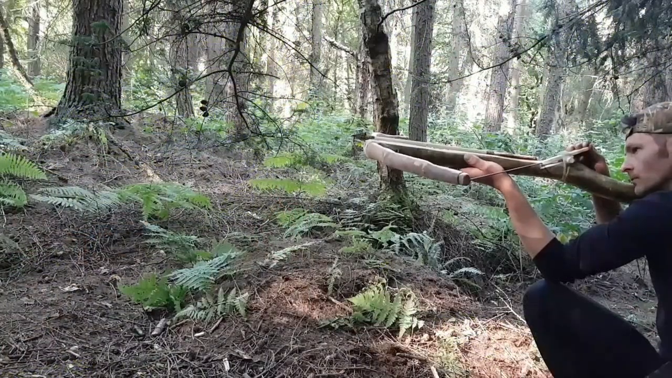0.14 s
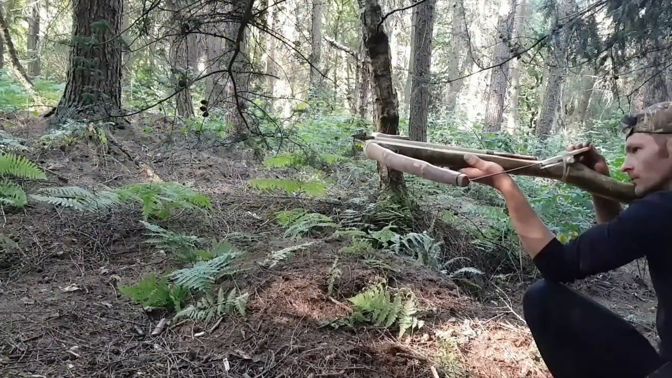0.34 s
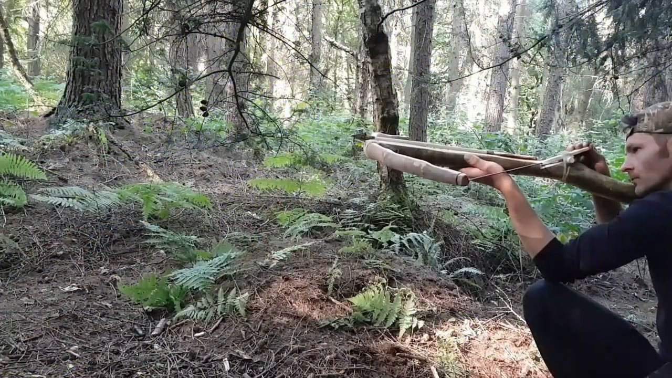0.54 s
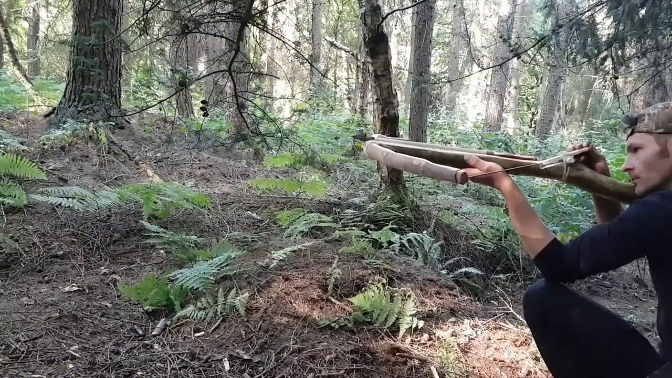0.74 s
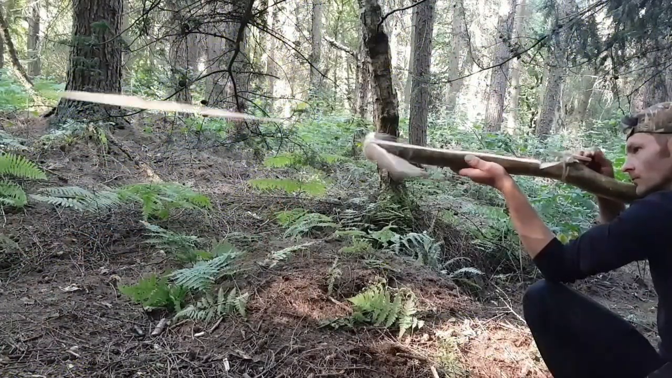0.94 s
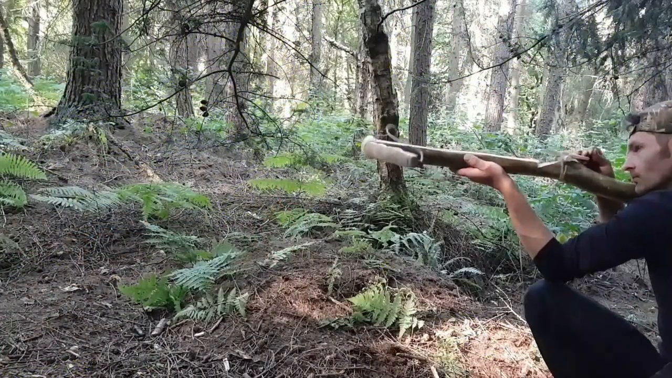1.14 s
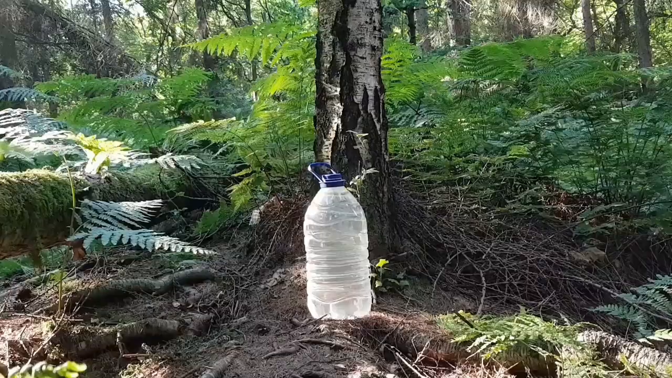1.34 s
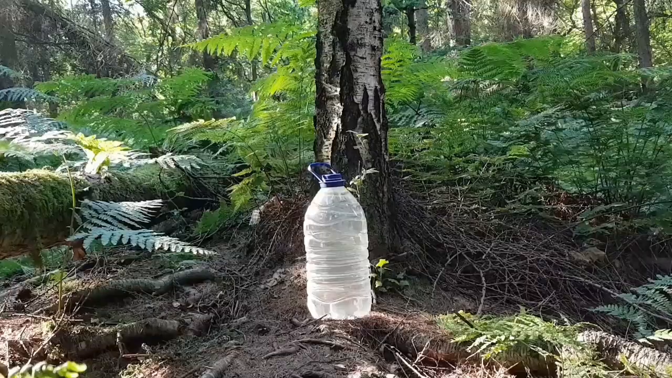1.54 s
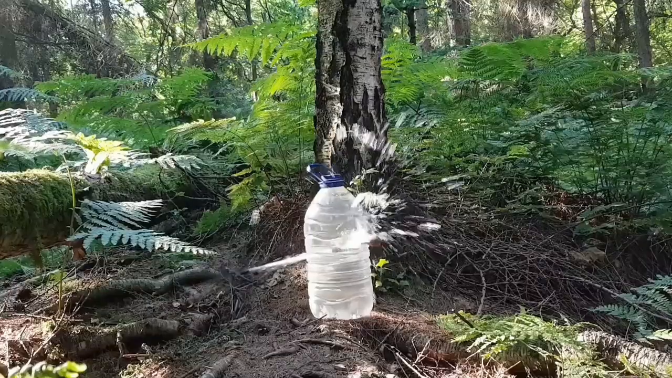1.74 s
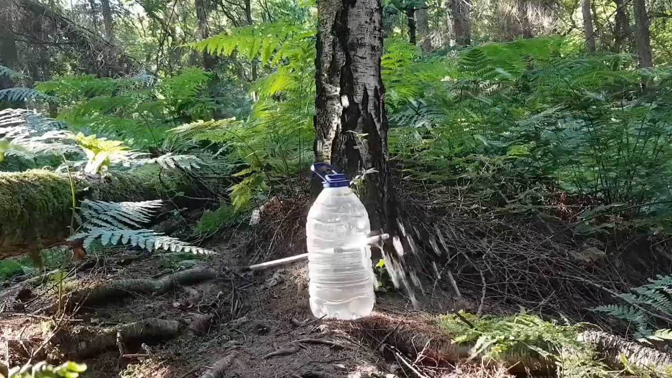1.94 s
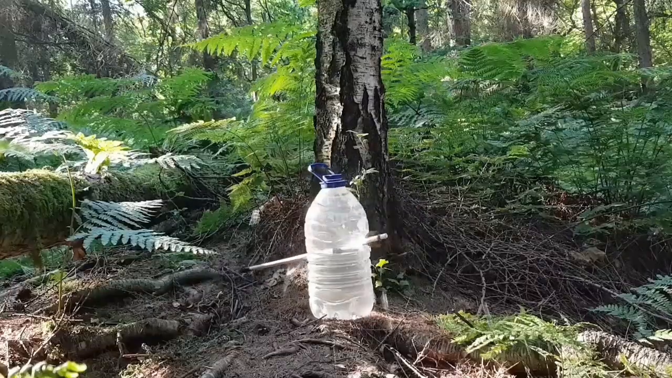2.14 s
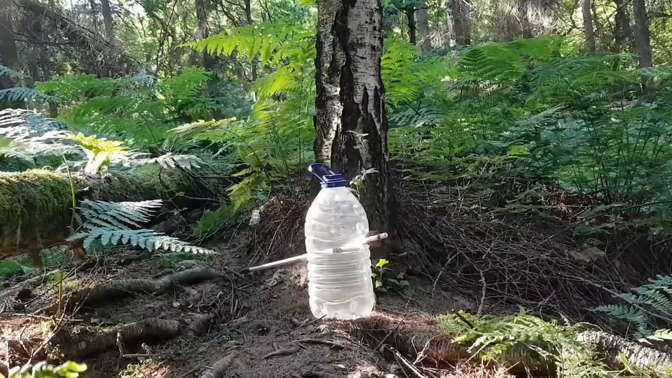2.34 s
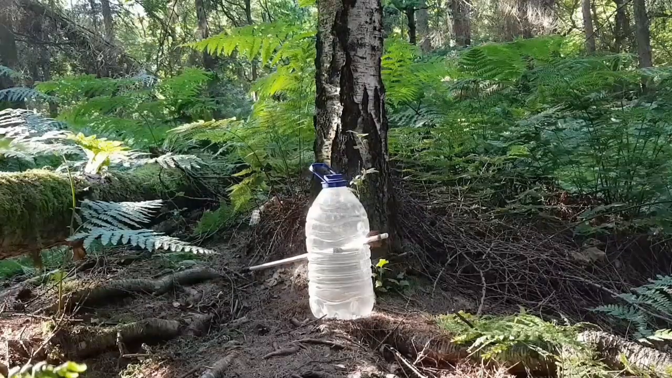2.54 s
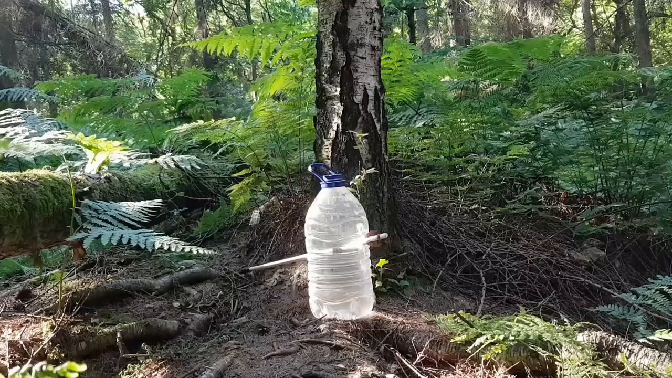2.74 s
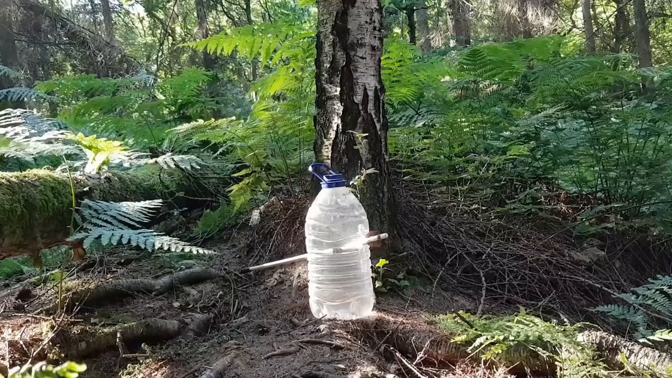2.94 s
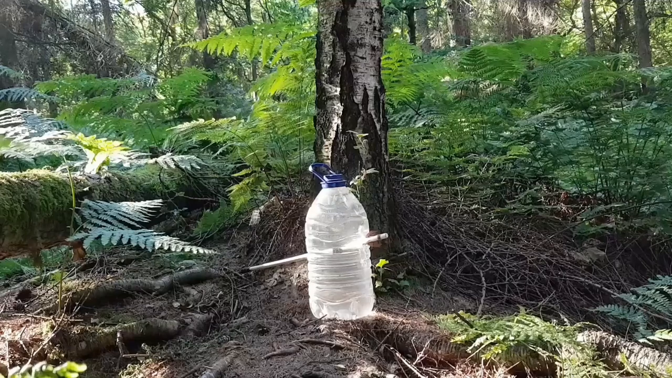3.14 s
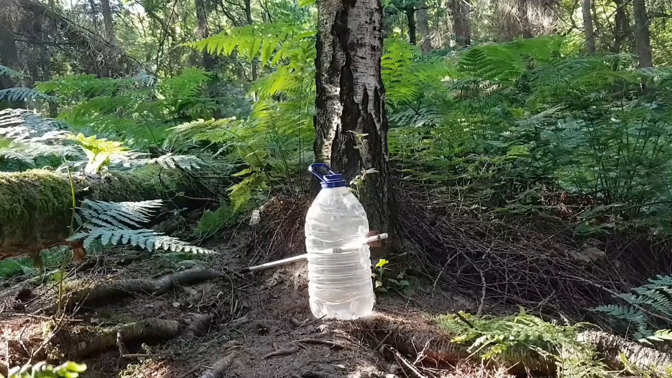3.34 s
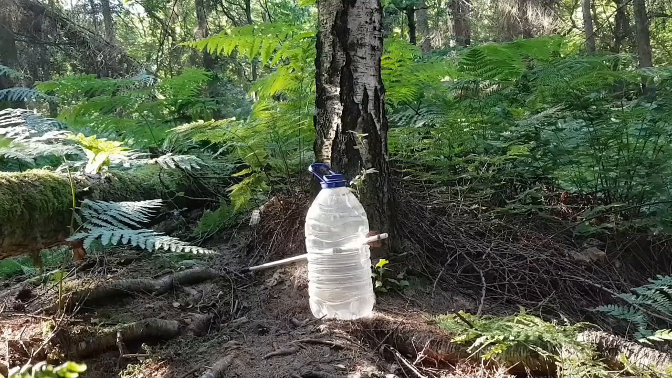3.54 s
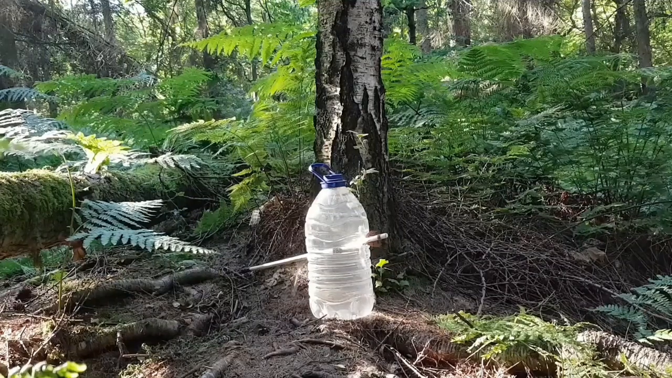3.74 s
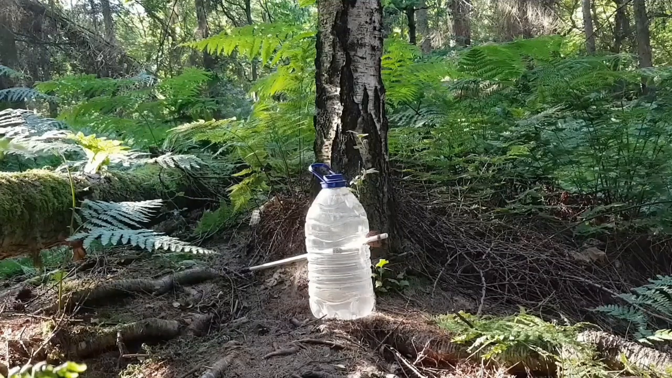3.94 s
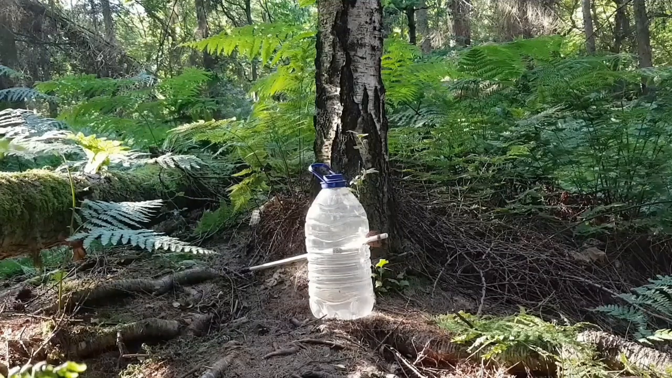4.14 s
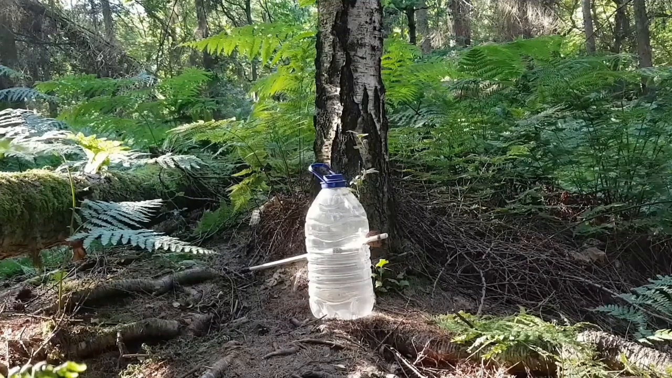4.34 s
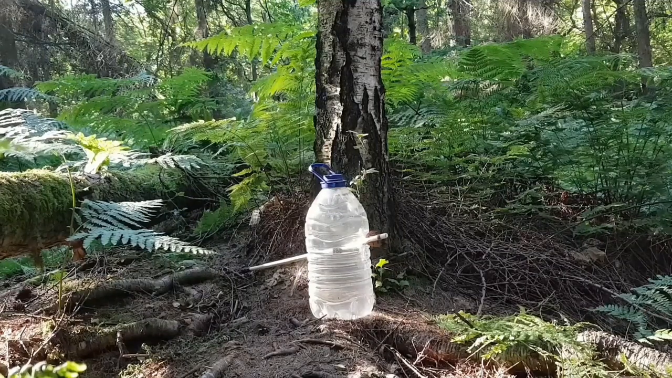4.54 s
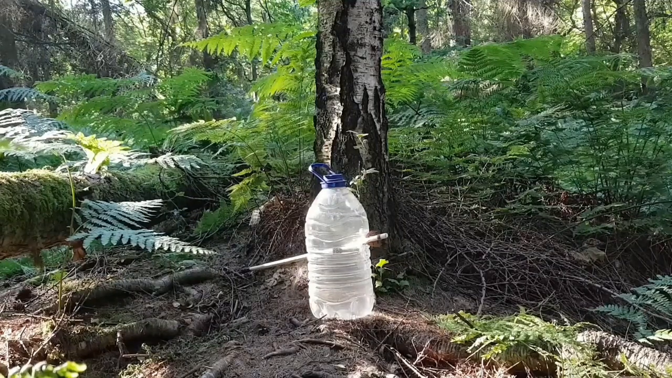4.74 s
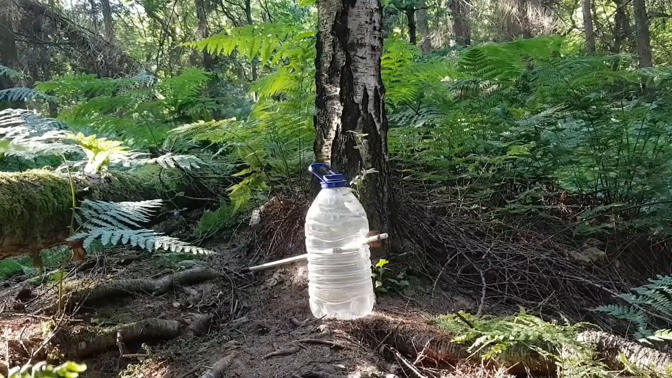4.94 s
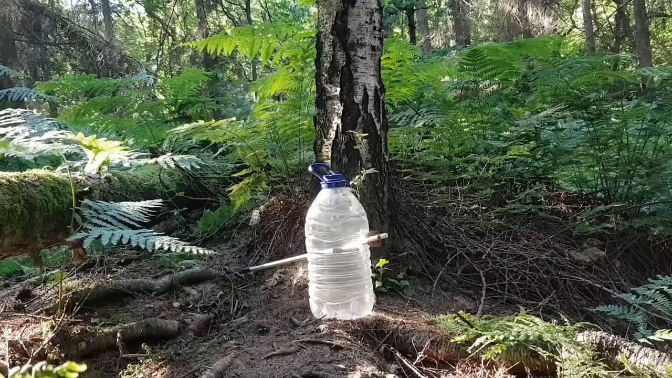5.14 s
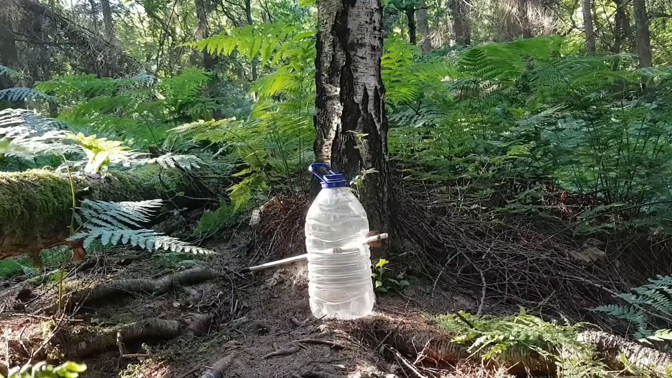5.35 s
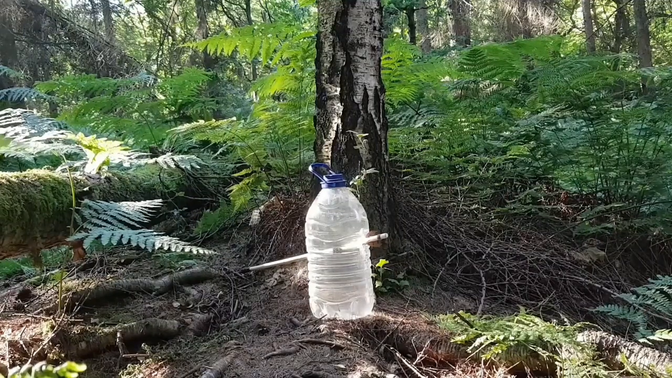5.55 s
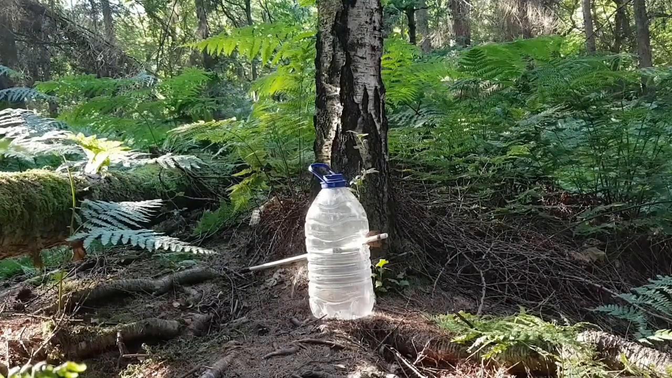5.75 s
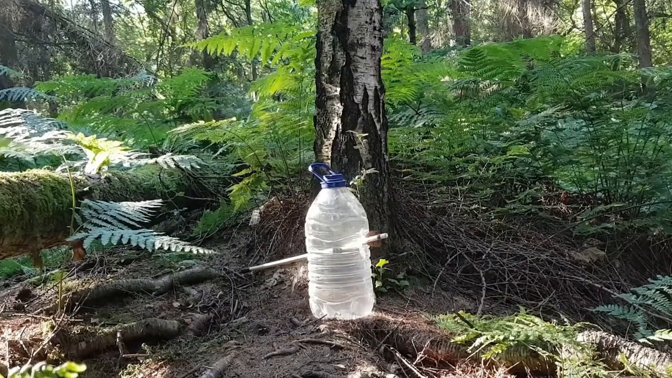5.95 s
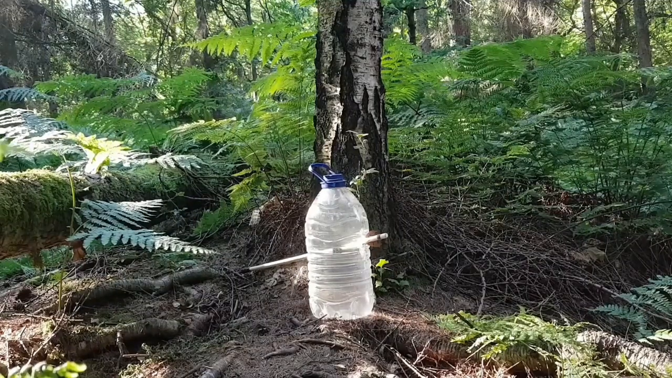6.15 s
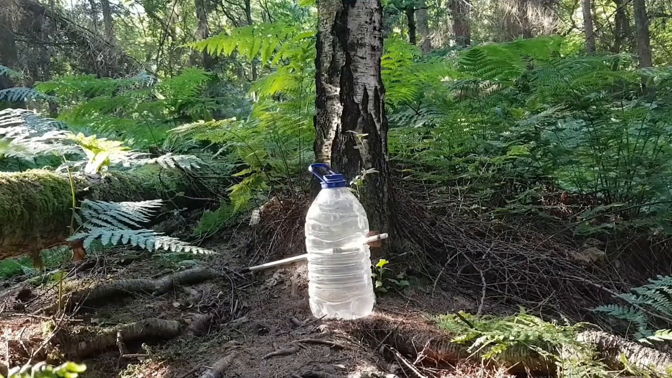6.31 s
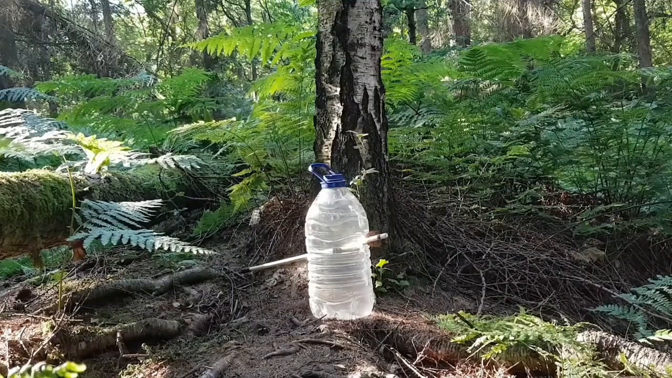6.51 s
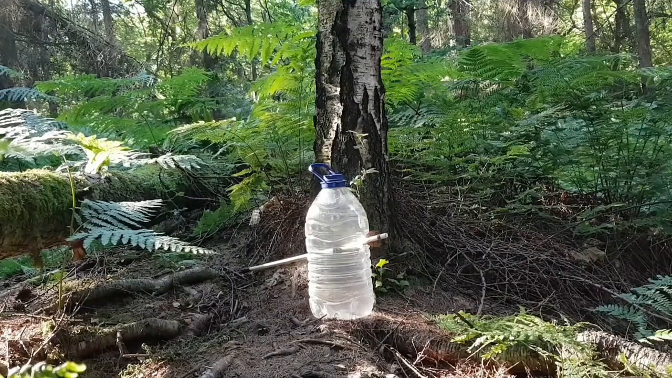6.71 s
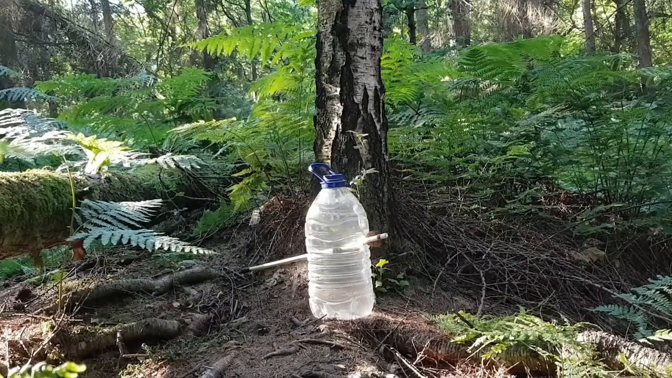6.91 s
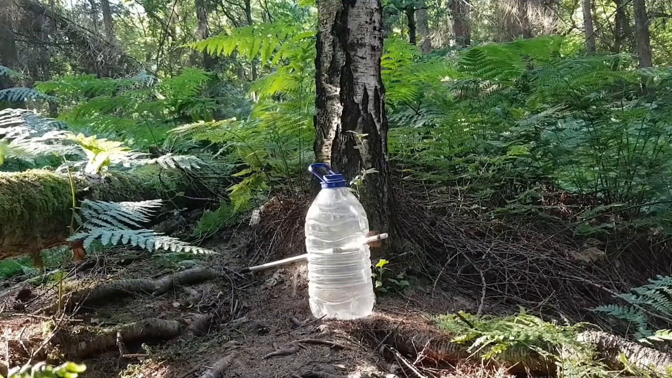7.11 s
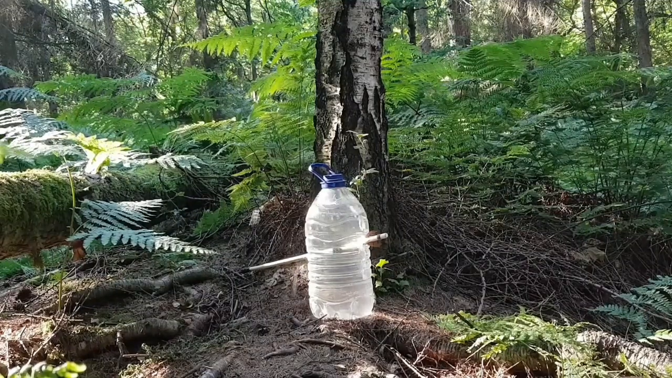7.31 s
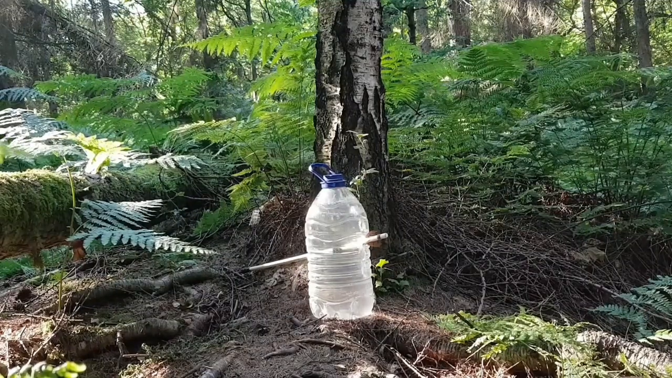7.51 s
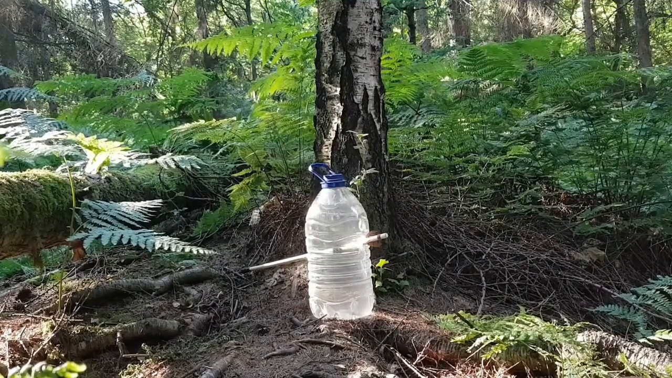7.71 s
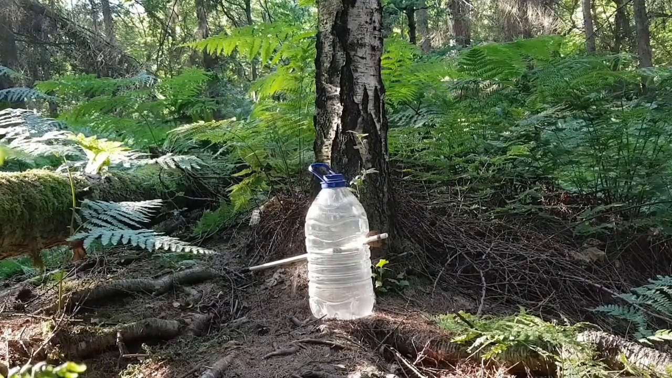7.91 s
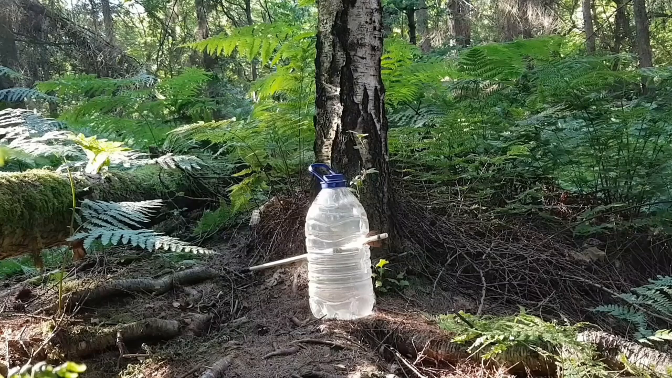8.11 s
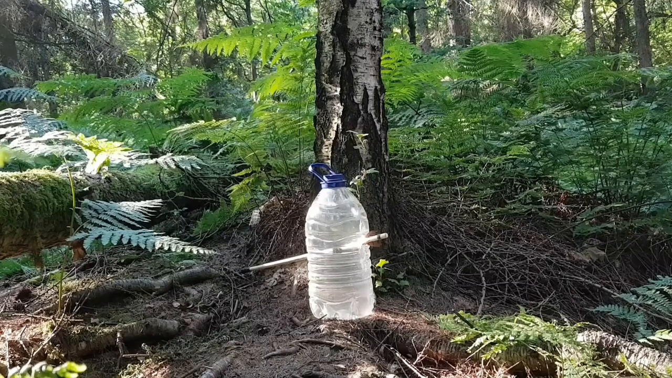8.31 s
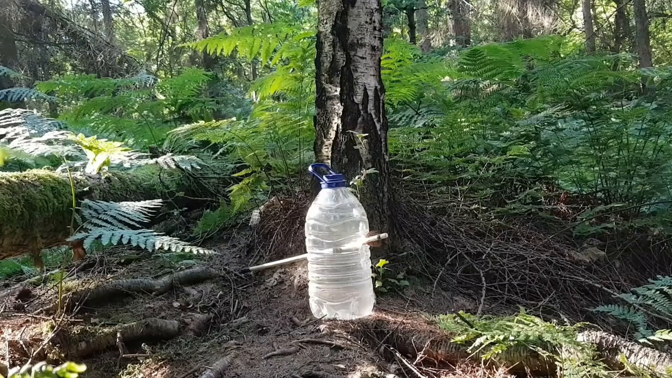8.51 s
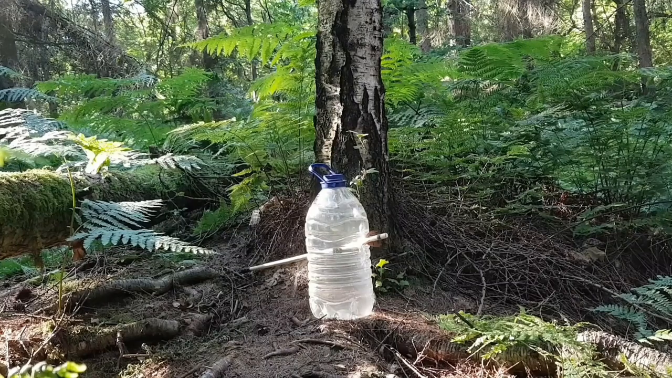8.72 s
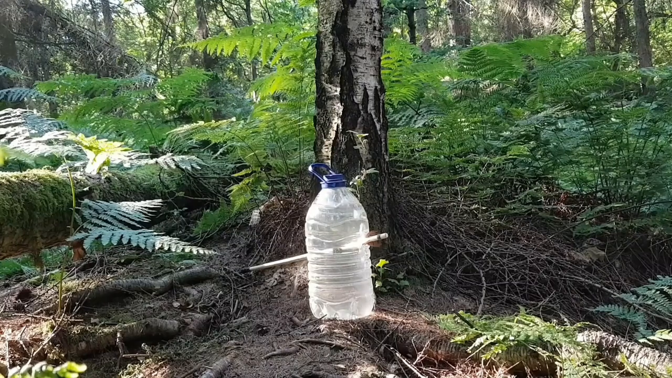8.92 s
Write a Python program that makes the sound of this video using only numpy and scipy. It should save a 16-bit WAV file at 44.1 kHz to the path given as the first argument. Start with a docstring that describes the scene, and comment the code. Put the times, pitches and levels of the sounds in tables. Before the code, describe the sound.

A homemade wooden crossbow is fired outdoors among trees. Soft ticking of the catch leads to a hard, woody snap with quick string rebounds and a short woodland echo. The listening place cuts to the target: another snap, a tenth of a second later a sharp plastic thwack and burst of water. It quickly thins to soft patter and delicate irregular drips under low wind murmur. The microphone is near the bottle, drips clear and small.

```python
"""In a forest, a wooden crossbow is heard from beside the archer, then, after a short silence, at the target.
The trigger creaks with clicks, knocks and scrapes; string and stock ring as decaying modes with noisy cracks.
The bolt punches a full plastic bottle: modes, cracks and a burst of spray. Water then patters and drips
as noisy splats with rising bubble tones. Tree trunks return echoes of scattered noise,
and wind murmurs far off in the trees as dull noise under a faint, even hiss."""
import sys
import numpy as np
from scipy import signal
from scipy.fft import rfft, irfft, next_fast_len
from scipy.io import wavfile
from scipy.ndimage import uniform_filter1d, map_coordinates

SR = 44100
rng = np.random.default_rng(int(sys.argv[2]) if len(sys.argv) > 2 else 0)


def pcm_store(signal):
    """Save signal as 16-bit PCM."""
    levels = np.round(np.clip(np.atleast_2d(signal), -1, 1) * 32767)
    wavfile.write(sys.argv[1], SR, levels.astype(np.int16).T)


N = 399987

# All levels are relative. Spectra hold pitch_hz [Hz], density_db [dB per Hz].
# silence between the two listening places: start_s [s], end_s [s]
SILENCE = (1.328, 1.373)
# likeness of the left and right channels: pitch_hz [Hz], likeness [-1 to 1]
LIKENESS = [(50, 1), (200, 0.91), (500, 0.52), (1000, 0.095), (2500, 0.11), (6000, 0.19), (14000, .5)]
# wind in the crowns above the target: start_s [s], level_db [dB]
WIND_LEVEL = [(1.4, -60), (1.7, -61), (1.91, -63.5), (3.55, -60), (4.08, -60.5), (4.87, -56.5), (5.06, -57),
              (5.87, -60.5), (9.05, -59.5)]
# wind murmur at the target: pitch_hz [Hz], density_db [dB per Hz]
MURMUR_AT_TARGET = [(13, -48), (22, -13), (43, -3), (76, -3), (103, -0.5), (134, -4), (172, -3.5),
                    (346, -11.5), (462, -8.5), (726, -7.5), (910, -9.5), (1460, -23), (3000, -41),
                    (3900, -52.5), (6600, -120)]
# wind murmur beside the archer: pitch_hz [Hz], density_db [dB per Hz]
MURMUR_BESIDE_ARCHER = [(15, -23.5), (30, -7), (58, -1), (80, -5), (118, -2), (170, -5), (250, -7),
                        (420, -11), (720, -6), (950, -7), (1400, -19.5), (3000, -43.5)]
# even hiss: pitch_hz [Hz], density_db [dB per Hz]
HISS_SPECTRUM = [(700, -25), (1200, -9), (2400, -11), (3200, -16.5), (5400, -22), (8300, -27.5),
                 (10000, -28), (13800, -18.5), (15500, -28.5)]
# dense echo from near trunks: pitch_hz [Hz], density_db [dB per Hz]
NEAR_TRUNKS = [(80, -4.5), (200, 7), (500, -6.5), (900, -4), (1600, -10), (2600, -0.5), (4500, -5.5),
               (14000, 4.5)]
# long echo from far trunks: pitch_hz [Hz], density_db [dB per Hz]
FAR_TRUNKS = [(80, 0.5), (200, 1), (500, -2.5), (900, -7), (1600, -9.5), (2600, -2), (4500, -2),
              (14000, -3.5)]
# water running from the pierced bottle: start_s [s], level_db [dB]
LEAK_FLOW = [(2.0, -79), (2.25, -71.5), (3.49, -82.5), (4.55, -73), (6.83, -77.5), (7.56, -74),
             (8.75, -77.5), (9.05, -73)]
# fine fizz of the leak: pitch_hz [Hz], density_db [dB per Hz]
FIZZ_SPECTRUM = [(1200, -10.5), (2200, -3), (4000, -5), (6500, -0.5), (9500, -6.5), (13500, -2),
                 (16000, -13)]
# largest drops on the ground: start_s [s], level_db [dB], pitch_hz of the bubble [Hz], treble_db share [dB]
LARGE_DRIPS = [(2.1025, -49, 1820, -18), (2.2368, -44, 1680, -28), (2.6272, -50, 2970, -15),
               (3.1582, -45, 3450, -19), (3.807, -47.5, 6820, -21), (3.9071, -42, 5220, -27),
               (4.172, -46.5, 3780, -25), (4.3019, -41, 4970, -24), (4.372, -45, 2710, -34),
               (4.6079, -41, 2870, -32), (5.2799, -45, 6060, -23), (5.3955, -44, 4310, -24),
               (5.7324, -46.5, 2140, -13), (6.3583, -45.5, 4770, -25), (6.9304, -43, 4740, -20),
               (7.3357, -39.5, 3620, -16.5), (7.7457, -37.5, 8380, -18), (7.9472, -41, 5500, -24),
               (8.1509, -38.5, 7590, -21), (8.9675, -42, 4250, -25)]
# gush from the hole: pitch_hz [Hz], density_db [dB per Hz]
GUSH_SPECTRUM = [(60, -9), (190, 9.5), (400, 2.0), (1000, 1.0), (1700, 5), (3000, -3),
                 (6000, -5), (9500, -10.5), (14000, -13.0)]
# bolt through both walls, then buckling plastic:
# start_s [s], ring_db [dB], bright_hz [Hz], crack_db [dB], crack_t60_s [s]
BOTTLE_CONTACTS = [(1.7325, -39, 3985, -43.5, .04), (1.735, -33, 4000, -31, 0.058),
                   (1.7378, -8, 6000, -12, 0.012), (1.7395, 3, 2495, -18.5, .03),
                   (1.7458, -9.5, 4500, -21, 0.026), (1.7575, -15.5, 3500, -36, .04),
                   (1.7695, -14.5, 2990, -30.5, .055)]
# ringing of the full bottle: pitch_hz [Hz], t60_s [s], level_db [dB]
BOTTLE_RING = [(88, 0.14, -44.5), (174, 0.0807, -26.5), (208.3, 0.054, -24), (331.3, 0.054, -33.5),
               (470, 0.058, -31), (700, 0.016, -12), (874, 0.022, -28.5), (1657, 0.079, -26.5),
               (1940, 0.027, -29), (2160, .04, -24), (2985, 0.026, -14)]
# cracking of the bottle wall: pitch_hz [Hz], density_db [dB per Hz]
BOTTLE_CRACK_SPECTRUM = [(25, -9), (70, -7), (230, 6.5), (450, -6.5), (1100, -2), (1900, 5), (3500, -0.5),
                         (6000, 2.5), (9500, -10.5), (13500, -3), (16000, -16.5)]
# stick-slips of the trigger: start_s [s], level_db [dB], scrape_db [dB]
TRIGGER_SLIPS = [(0.7479, -38.5, -63), (0.8349, -41, -63), (0.887, -39, -64.5), (0.917, -42, -65),
                 (0.935, -41, -66)]
# ringing of the wooden catch: pitch_hz [Hz], t60_s [s], level_db [dB]
CATCH_RING = [(980, 0.0332, -15), (1360, 0.028, -8.5), (1840, 0.014, -11.5), (3210, .03, -26),
              (4810, 0.0082, -19)]
# click of the catch: pitch_hz [Hz], density_db [dB per Hz]
CLICK_SPECTRUM = [(500, -22.0), (3000, 4.5), (4200, -7.5), (6800, 0.5), (9500, -22), (14000, -12.5)]
# scrape of the catch: pitch_hz [Hz], density_db [dB per Hz]
SCRAPE_SPECTRUM = [(1200, -29), (2500, -4.5), (3200, 1.5), (4200, -10.5), (12000, -23.0)]
# a faint swish of the travelling string, then hard contacts of string and stock, beside the archer: # start_s
# [s], ring_db [dB], bright_hz [Hz], crack_db [dB], crack_t60_s [s]
CONTACTS_BESIDE_ARCHER = [(1.0367, -36.5, 2500, -45, .03), (1.0403, -22.5, 2497, -34, 0.026),
                          (1.0423, 0, 2990, -11.5, .0065), (1.0442, -6, 2507, -31.5, .02),
                          (1.0488, -9, 6000, -35.5, 0.065), (1.0535, -9.5, 2963, -35.5, .04),
                          (1.0595, -8.5, 1781, -30, .07)]
# the same swish and contacts heard from ahead, at the target: # start_s [s], ring_db [dB], bright_hz [Hz],
# crack_db [dB], crack_t60_s [s]
CONTACTS_AT_TARGET = [(1.6365, -31.5, 3010, -36.5, .02), (1.6388, 2, 4000, -16.5, 0.018),
                      (1.6415, -2.5, 2660, -34, .02), (1.6455, -3, 1333, -24, 0.035),
                      (1.6648, -15.5, 5000, -26, 0.054), (1.6758, -14, 3464, -23, 0.019)]
# ringing of stock, limbs and string: pitch_hz [Hz], t60_s [s], beside_archer_db [dB], at_target_db [dB]
BOW_RING = [(95.15, 0.07, -49.5, -47.5), (170, 0.13, -52.5, -43), (298, 0.033, -44, -47.5),
            (461, .05, -43.5, -32), (545, 0.069, -40.5, -43), (648, 0.043, -35, -45.5),
            (787.3, 0.02, -30.5, -24), (901, 0.035, -21, -47.5), (1250, .035, -17.5, -23),
            (1620, .016, -4.5, -21.5), (1605, 0.024, -30.5, -5.5), (1945, .017, -14.5, -8.5),
            (2234, .03, -24.5, -24), (2750, 0.019, -24.5, -13.5)]
# crack of string on stock: pitch_hz [Hz], density_db [dB per Hz]
BOW_CRACK_SPECTRUM = [(25, -16), (70, -14), (400, 1), (1500, 3), (2500, 4), (4000, 0.5), (6800, 2),
                      (9500, -9.5), (13500, -7.5), (16000, -17.5)]

TIME = np.arange(N) / SR
AGE = TIME[:SR // 2]   # seconds since the onset of a short sound
LEFT_RIGHT = np.array([[1], [-1]])   # gain in dB times this tilts a sound left, or right if negative


def from_db(db):
    """Turn decibels into amplitude gain."""
    return 10 ** (np.asarray(db) / 20)


def rms_one(x):
    """Scale to unit power."""
    return x / np.sqrt(np.mean(x ** 2) + 1e-20)


def fade(t60, age=AGE):
    """Lose energy exponentially, falling 60 dB in t60 seconds."""
    return np.exp(-np.log(1000) * age / max(t60, 1e-4))


def at_hz(points, hz):
    """Read a spectrum on a log-frequency axis."""
    known, values = np.transpose(points)
    return np.interp(np.log(np.maximum(hz, 1)), np.log(known), values)


def add(out, start_s, sound):
    """Mix a sound in from start_s."""
    start = int(round(start_s * SR))
    out[..., start:start + sound.shape[-1]] += sound[..., :N - start]


def butter(x, hz, kind, order=2):
    """Filter causally, low- or high-pass."""
    sos = signal.butter(order, min(hz, SR / 2 - 1), kind, fs=SR, output="sos")
    return signal.sosfilt(sos, x)


def colour(white, spectrum):
    """Shape two white signals into a stereo pair of unit power, most alike in the bass."""
    size = next_fast_len(white.shape[-1])
    hz = np.arange(size // 2 + 1) * SR / size
    alike = np.clip(at_hz(LIKENESS, hz), -1, 1)
    mid, side = rfft(white, size) * from_db(at_hz(spectrum, hz))
    pair = np.sqrt(1 + alike) * mid + np.sqrt(1 - alike) * side * LEFT_RIGHT
    return rms_one(irfft(pair, size)[:, :white.shape[-1]])


def noise(spectrum, size=N):
    """Make coloured stereo noise of unit power."""
    return colour(rng.standard_normal((2, size)), spectrum)


def forest(x, near_db, near_t60, far_db, far_t60):
    """Near trunks scatter sound into a dense tail, far ones into a faint longer tail."""
    age = TIME[:SR]
    near = from_db(near_db) * fade(near_t60, age) * noise(NEAR_TRUNKS, size=SR)
    far = from_db(far_db) * fade(far_t60, age) * noise(FAR_TRUNKS, size=SR)
    echo = (near + far) * (1 - np.exp(-age / 0.0013))
    return x + signal.fftconvolve(x, echo, axes=1)[:, :N]


def ring_of(modes, bright_hz):
    """A struck body rings in decaying modes; a duller contact excites fewer high ones."""
    ring = np.zeros(len(AGE))
    for k, (hz, t60, db) in enumerate(modes):
        reach = np.exp(-(hz / bright_hz) ** 2)
        ring += (-1) ** k * from_db(db) * reach * fade(t60) * np.sin(2 * np.pi * hz * AGE)
    return ring


def crack_of(spectrum, t60, grain_db, width_db):
    """Breaking contact crackles as dying noise whose loudness jumps from sample to sample."""
    jumps_db = grain_db * np.clip(rng.standard_normal(len(AGE)), -2, 2)
    grains = rng.standard_normal((2, len(AGE))) * from_db(jumps_db)
    dying = fade(t60)
    crack = colour(grains * from_db([[0], [width_db]]), spectrum) * dying
    # the blow sets the energy, chance only the grain
    return rms_one(crack) * np.sqrt(np.mean(dying ** 2))


def blows(contacts, modes, crack_spectrum, rise_s, left_lag_ms, grain_db, width_db):
    """Each contact crackles and rings the body; the left channel can lag."""
    out = np.zeros((2, N))
    swell = 1 - np.exp(-AGE / rise_s)   # the blow takes a moment to spread through the body
    for start_s, ring_db, bright_hz, crack_db, crack_t60 in contacts:
        ring = swell * ring_of(modes, bright_hz)
        crack = crack_of(crack_spectrum, crack_t60, grain_db, width_db)
        add(out, start_s, from_db(ring_db) * ring + from_db(crack_db) * crack)
    lagged = np.arange(N) - left_lag_ms / 1000 * SR
    out[0] = map_coordinates(out[0], [lagged], order=3)
    return out


def drop(hz, cycles, splat_db):
    """A drop makes a sharp splat and a tiny bubble that rises in pitch as it dies."""
    age = AGE[:SR // 50]
    life = cycles / hz   # seconds to fall 60 dB
    bubble = np.sin(2 * np.pi * hz * (age + .06 * age ** 2 / life)) * fade(life, age)
    burst = rng.choice([-1, 1], len(age)) * fade(.003, age)
    splat = butter(burst, max(hz * .9, 3300), "high", order=3)
    return (bubble + from_db(splat_db) * splat) * (1 - np.exp(-age / 0.00013))


def wind(beside_db, target_db, hiss_db):
    """Distant crowns murmur, evenly beside the archer and in swells at the target, under an even hiss."""
    beside = from_db(beside_db) * noise(MURMUR_BESIDE_ARCHER)
    gust_db = target_db + np.interp(TIME, *np.transpose(WIND_LEVEL))
    at_target = from_db(gust_db) * noise(MURMUR_AT_TARGET)
    murmur = np.where(TIME < SILENCE[0], beside, at_target)
    return murmur + from_db(hiss_db) * noise(HISS_SPECTRUM)


def trickle(per_s, drop_db, spread_db, fizz_db):
    """The leak patters on the needles in little spurts over a fine fizz, both following the flow."""
    flow = from_db(np.interp(TIME, *np.transpose(LEAK_FLOW)))
    flow = flow * np.interp(TIME, [1.75, 1.95], [0, 1])
    spurts = rng.exponential(1, 100)   # how thickly drops fall in each tenth of a second or so
    patter = np.zeros((2, N))
    candidates = 1500
    for when, chance, pitch, size, side in rng.random((candidates, 5)):
        density = spurts[int(when * len(spurts))]
        if chance < density * per_s * TIME[-1] / candidates:
            sound = drop(2100 + 6700 * pitch, cycles=20, splat_db=-8)
            level_db = drop_db + spread_db * min(-np.log(size), 3)
            tilt_db = 3.14 * (side - 2.0) * LEFT_RIGHT   # scattered to the right
            add(patter, when * TIME[-1], sound * from_db(level_db + tilt_db))
    return flow * (patter + from_db(fizz_db) * noise(FIZZ_SPECTRUM))


def small_drips(times, level_db):
    """Small drops of chance loudness and pitch, with a splat beside each bubble."""
    low_hz, high_hz, spread_db, splat_db = 1590, 7260, 1.5, -3.5
    out = np.zeros(N)
    chances = rng.standard_normal((len(times), 2))
    for start_s, (size, splat), pitch in zip(times, chances, rng.random(len(times))):
        hz = low_hz + (high_hz - low_hz) * pitch
        sound = drop(hz, cycles=19, splat_db=splat_db + spread_db * splat)
        add(out, start_s, from_db(level_db + spread_db * size) * sound)
    return out


def drips():
    """Below the bottle, thrown water falls in a soft shower, the leak drips and large drops tick."""
    start_s, shower_mean_s, end_s = 2.15, .3, TIME[-1]
    shower = start_s + shower_mean_s * rng.exponential(1, size=24)
    dripping = rng.uniform(start_s, end_s, size=55)
    # thrown water lands more softly than the leak's drops
    out = small_drips(shower[shower < end_s], level_db=-55.5)
    out = out + small_drips(dripping, level_db=-50.5)
    usual_treble_db = np.mean(LARGE_DRIPS, axis=0)[-1]
    for start_s, level_db, hz, treble_db in LARGE_DRIPS:
        # the splat partly follows the treble share of each drop
        splat_db = -0.5 + 0.58 * (treble_db - usual_treble_db)
        add(out, start_s, from_db(level_db) * drop(hz, cycles=14, splat_db=splat_db))
    stereo = out * from_db(.6 * LEFT_RIGHT)
    return forest(stereo, near_db=-26.0, near_t60=0.057, far_db=-64, far_t60=0.46)


def spray(start_s, gush_db, gush_t60, drop_db, mean_flight_s):
    """Water bursts from the hole: a lumpy gush, then droplets that thin out and grow fainter."""
    out = np.zeros((2, N))
    lumps = np.abs(rms_one(butter(rng.standard_normal(len(AGE)), 280, "low")))
    envelope = (1 - np.exp(-AGE / 0.0046)) * fade(gush_t60)
    gush = noise(GUSH_SPECTRUM, size=len(AGE)) * lumps * envelope
    add(out, start_s, from_db(gush_db) * gush)
    for flight, pitch, side in rng.random((90, 3)):
        flight_s = -np.log(flight) * mean_flight_s
        sound = drop(1500 * 5 ** pitch, cycles=19, splat_db=-5.5) * fade(0.27, flight_s)
        tilt_db = 6 * (side - 1.5) * LEFT_RIGHT   # scattered to the right
        add(out, start_s + flight_s, sound * from_db(drop_db + tilt_db))
    return out


def bottle():
    """The thin wall cracks, the mass of water thumps and sprays out."""
    hit = blows(BOTTLE_CONTACTS, BOTTLE_RING, BOTTLE_CRACK_SPECTRUM,
                rise_s=0.0022, left_lag_ms=0, grain_db=1.5, width_db=-4.5)
    hit = hit + spray(start_s=1.749, gush_db=-23, gush_t60=0.13, drop_db=-37.0, mean_flight_s=0.097)
    stereo = hit * from_db(.5 * LEFT_RIGHT)
    return forest(stereo, near_db=-41.5, near_t60=0.22, far_db=-54.5, far_t60=0.52)


def trigger():
    """Each slip of the sticking catch gives a fine click, a small wooden knock and a short scrape."""
    out = np.zeros((2, N))
    for start_s, level_db, scrape_db in TRIGGER_SLIPS:
        knock = np.zeros(len(AGE))
        for hz, t60, mode_db in CATCH_RING:
            gain = from_db(mode_db + rng.normal(0, 2))   # each slip strikes the modes a little differently
            knock += gain * fade(t60) * np.sin(2 * np.pi * hz * AGE)
        click = noise(CLICK_SPECTRUM, size=len(AGE)) * fade(0.013)
        scrape = noise(SCRAPE_SPECTRUM, size=len(AGE)) * np.exp(-((AGE - .017) / 0.006) ** 2)
        add(out, start_s, from_db(level_db - 6) * click)
        add(out, start_s + 0.00089, from_db(level_db - 0.5) * knock)
        add(out, start_s, from_db(scrape_db) * scrape)
    return forest(out, near_db=-35.5, near_t60=0.23, far_db=-56.5, far_t60=0.67)


def rebounds(first_s, ring_db, bright_hz, crack_db, loss_db, count):
    """The slack string swings back against the stock at a steady pace, ever more softly."""
    spacing_s, crack_t60_s = .0221, .04
    contacts = []
    for k in range(count):
        ring = ring_db - loss_db * k ** 3   # slow loss at first, then faster
        contacts.append((first_s + k * spacing_s, ring, bright_hz, crack_db - loss_db * k, crack_t60_s))
    return contacts


def crossbow():
    """String hits stock and rebounds, heard from beside the archer and then from ahead at the target."""
    modes = np.array(BOW_RING)
    near = CONTACTS_BESIDE_ARCHER + rebounds(first_s=1.0645, ring_db=4.5, bright_hz=950,
                                             crack_db=-41.5, loss_db=.8, count=4)
    far = CONTACTS_AT_TARGET + rebounds(first_s=1.6595, ring_db=7.5, bright_hz=820,
                                        crack_db=-43.5, loss_db=0.1, count=3)
    beside = blows(near, modes[:, [0, 1, 2]], BOW_CRACK_SPECTRUM,
                   rise_s=0.00041, left_lag_ms=.11, grain_db=6, width_db=-3.5)
    ahead = blows(far, modes[:, [0, 1, 3]], BOW_CRACK_SPECTRUM,
                  rise_s=0.00078, left_lag_ms=0.37, grain_db=4.5, width_db=-1.5)
    beside = forest(beside, near_db=-29.0, near_t60=0.23, far_db=-47.5, far_t60=0.55)
    ahead = forest(ahead, near_db=-31.0, near_t60=0.2, far_db=-49.5, far_t60=.6)
    return beside + ahead


def scene():
    """Sum all sources, with a brief silence between the two listening places."""
    background = wind(beside_db=-59, target_db=4, hiss_db=-71.5)
    water = drips() + trickle(per_s=110, drop_db=9.5, spread_db=3.5, fizz_db=-0.5)
    outside_silence = (TIME < SILENCE[0]) | (TIME > SILENCE[1])
    heard = uniform_filter1d(1. * outside_silence, size=100)   # edges of about 2 ms
    return heard * (background + water + bottle() + trigger() + crossbow())


def record(dry):
    """The microphone signal has its loudest peaks rounded and its top cut steeply."""
    rounded = 0.86 * np.tanh(dry / 0.75)
    cutoff_hz = 14600
    low_pass = signal.ellip(10, .2, 80, cutoff_hz, fs=SR, output="sos")
    return signal.sosfilt(low_pass, rounded)


dry = scene()
out = record(dry)
pcm_store(out)
```